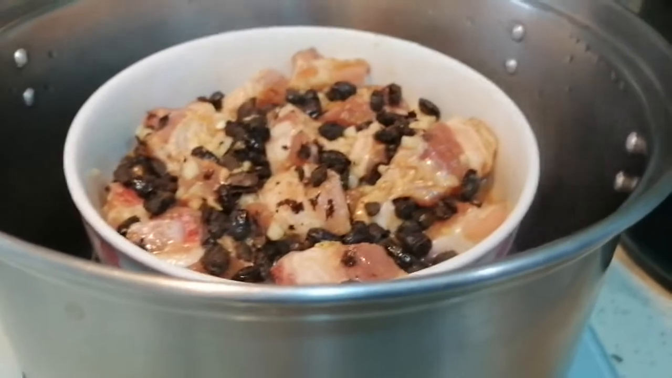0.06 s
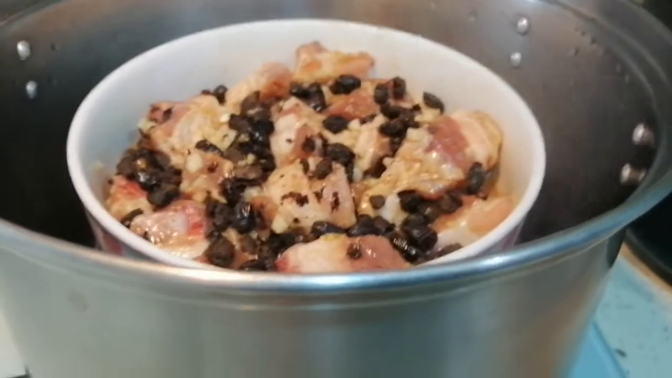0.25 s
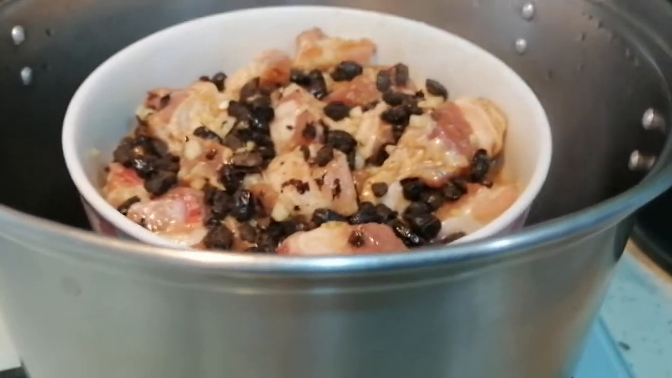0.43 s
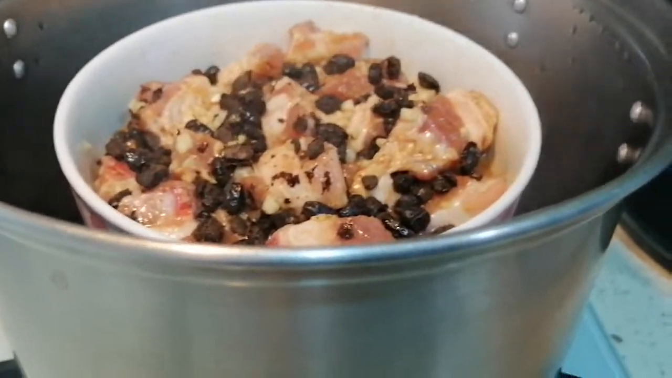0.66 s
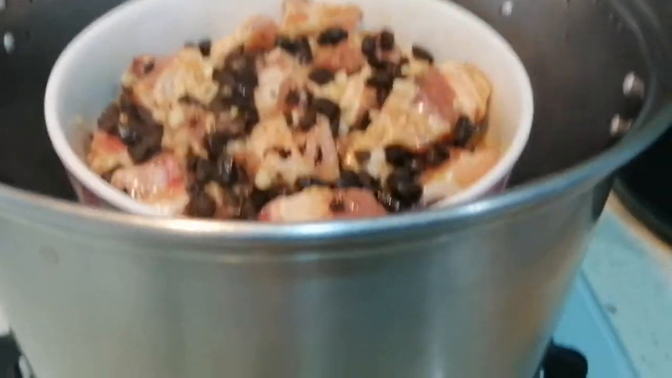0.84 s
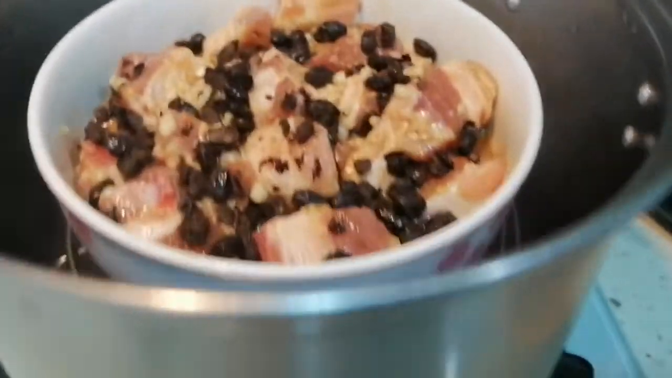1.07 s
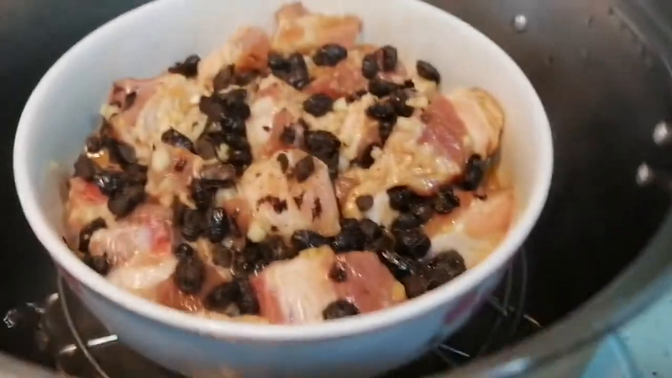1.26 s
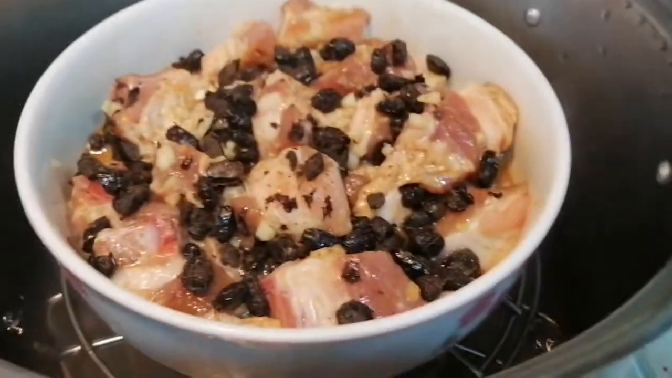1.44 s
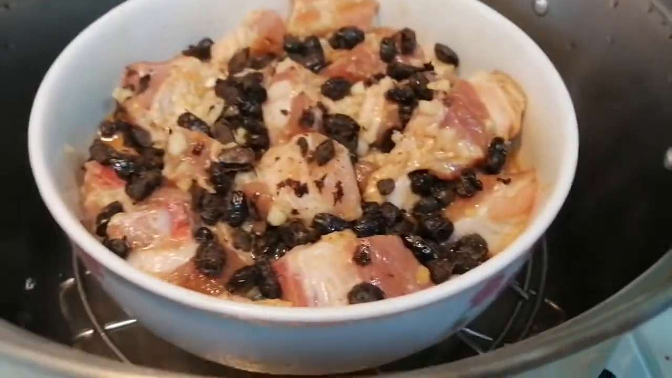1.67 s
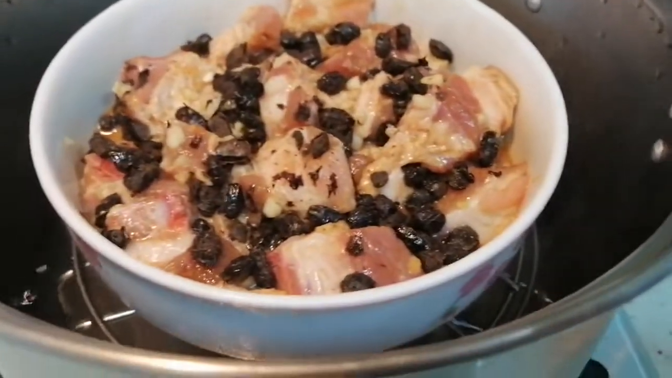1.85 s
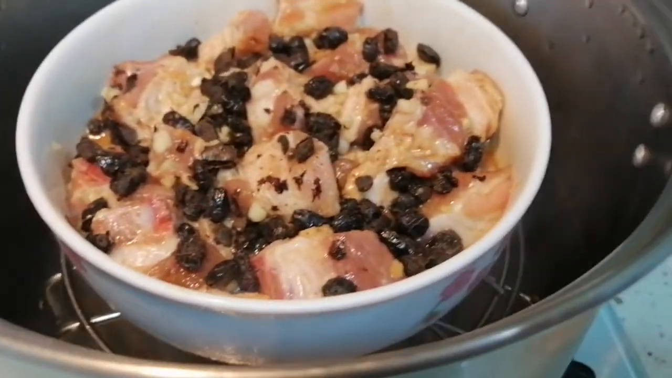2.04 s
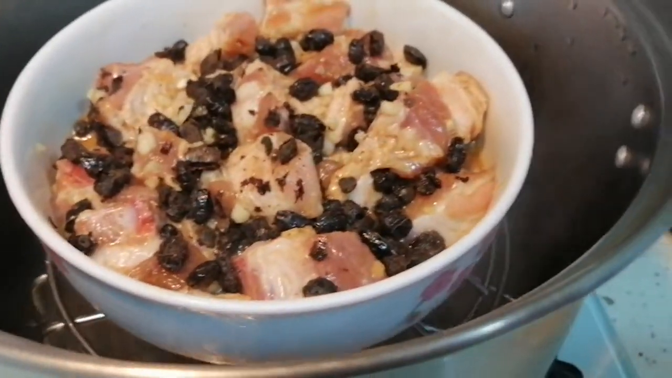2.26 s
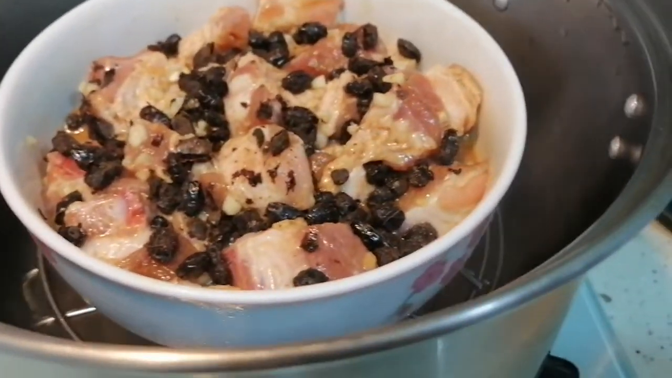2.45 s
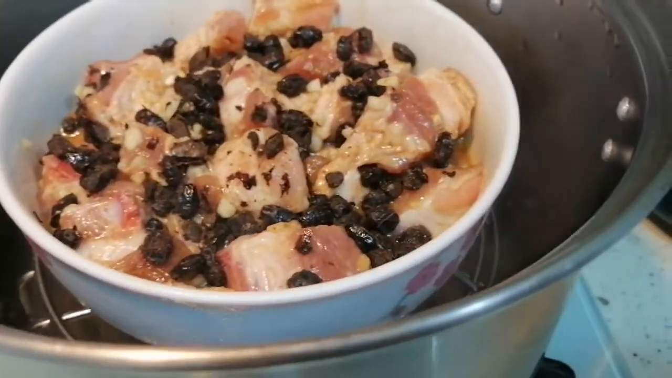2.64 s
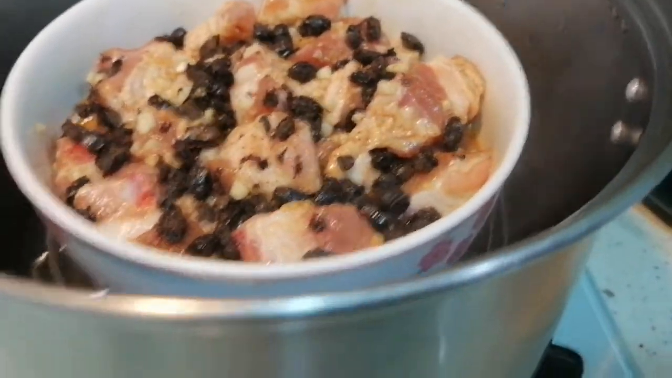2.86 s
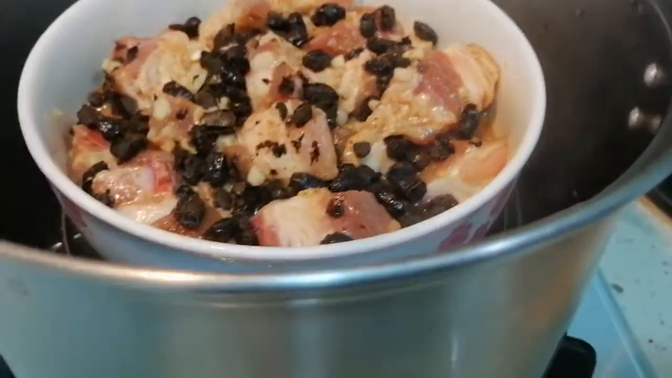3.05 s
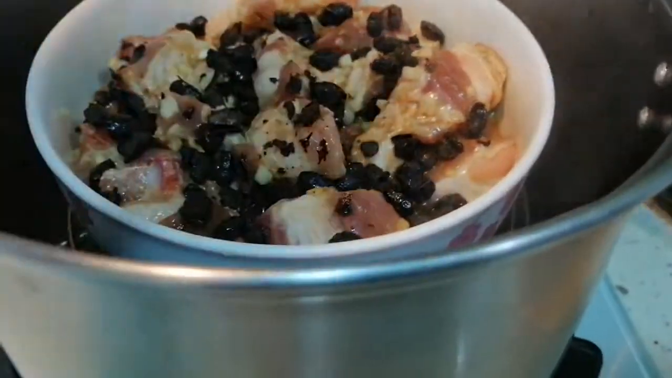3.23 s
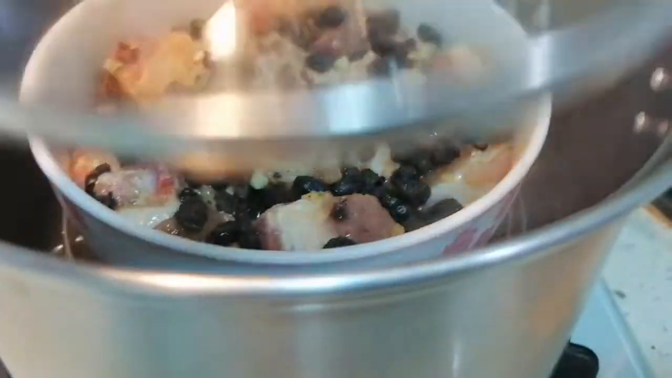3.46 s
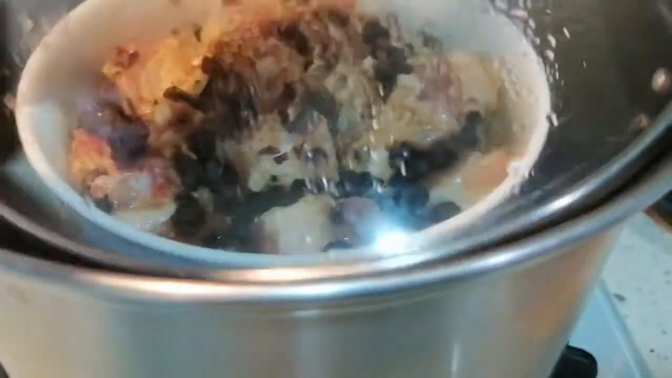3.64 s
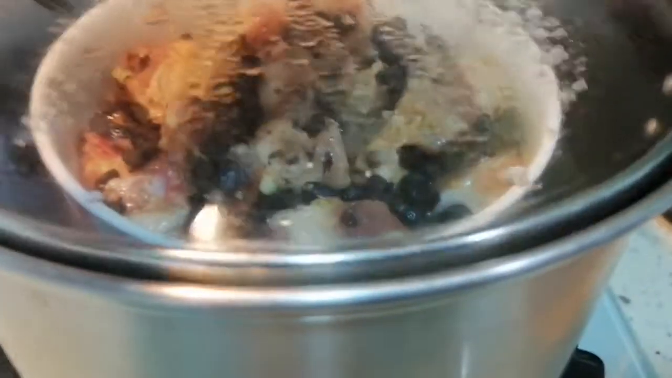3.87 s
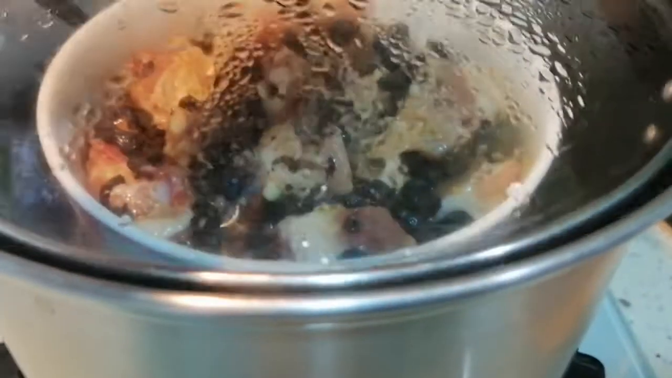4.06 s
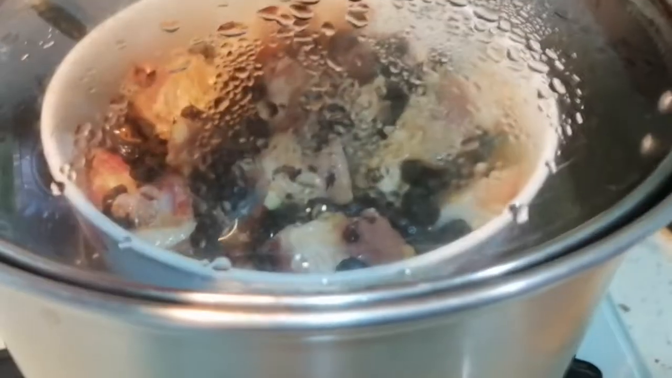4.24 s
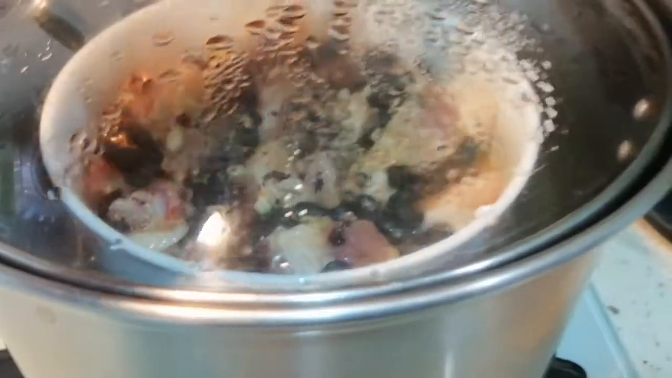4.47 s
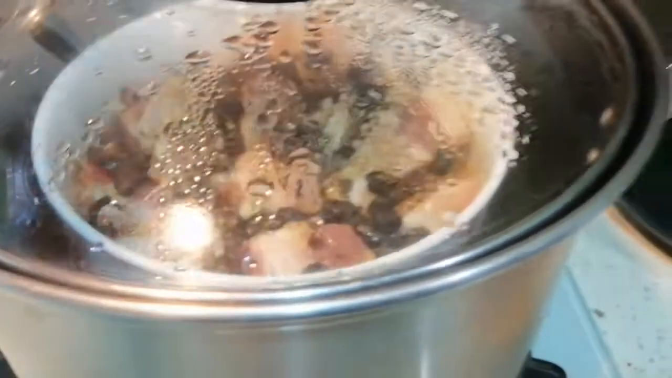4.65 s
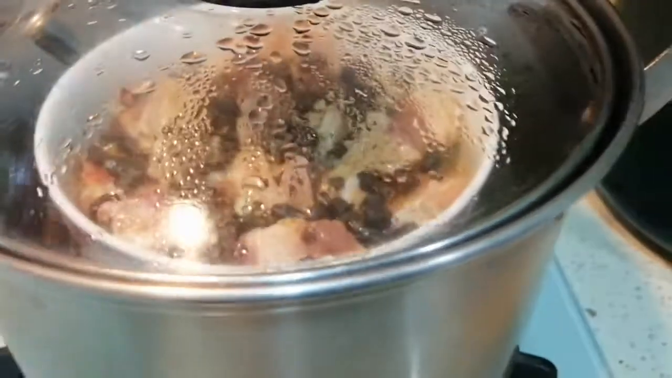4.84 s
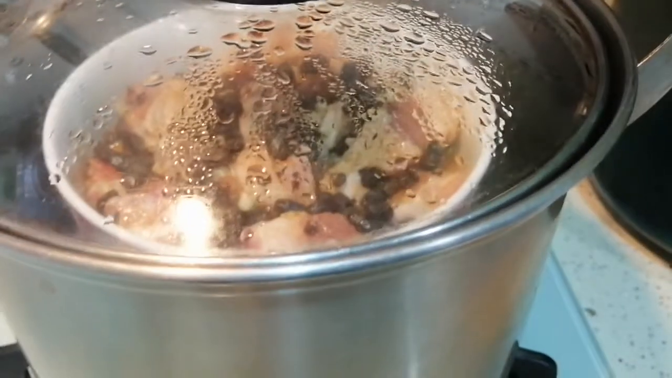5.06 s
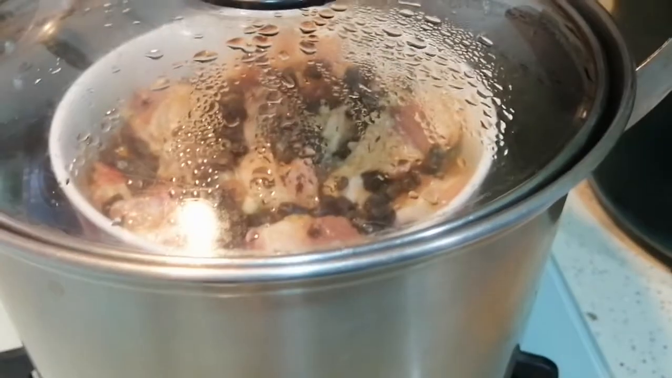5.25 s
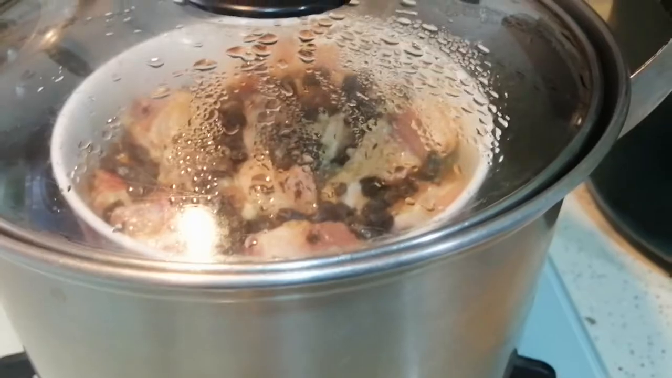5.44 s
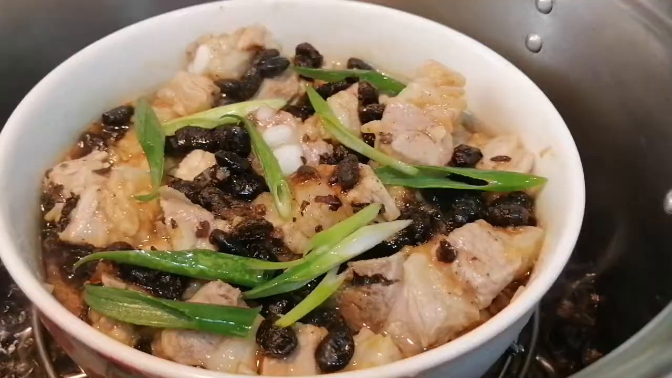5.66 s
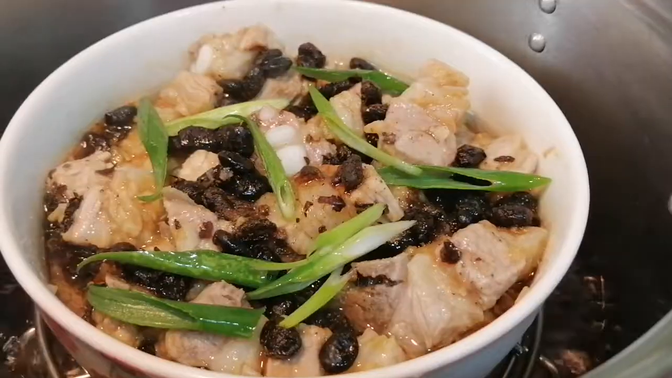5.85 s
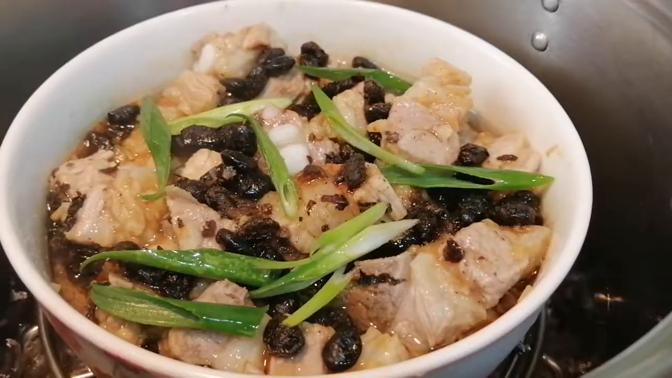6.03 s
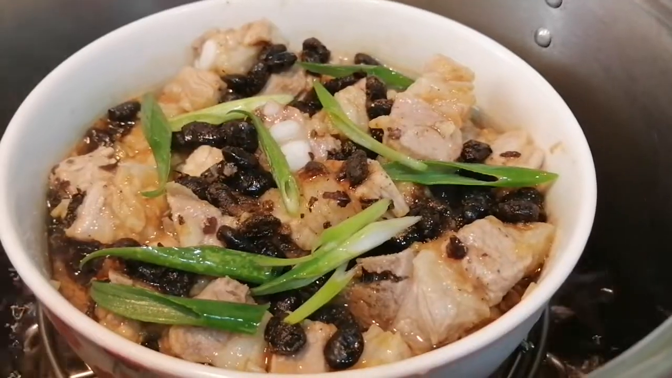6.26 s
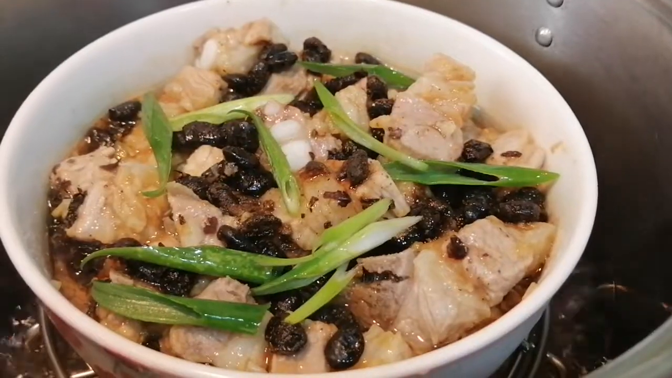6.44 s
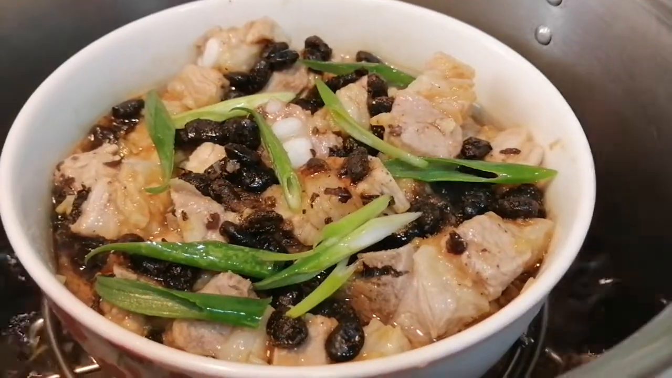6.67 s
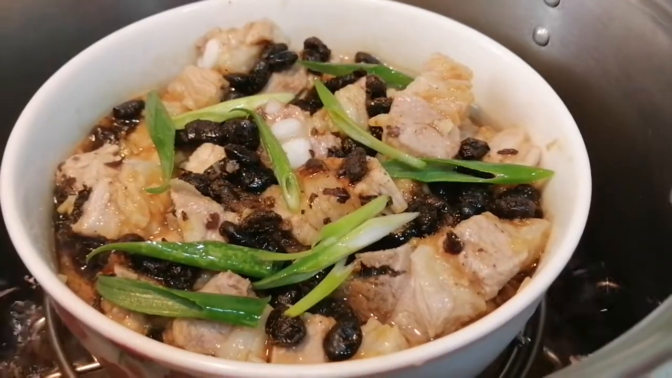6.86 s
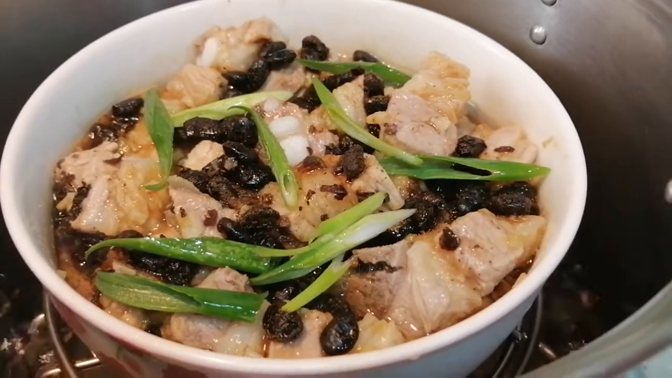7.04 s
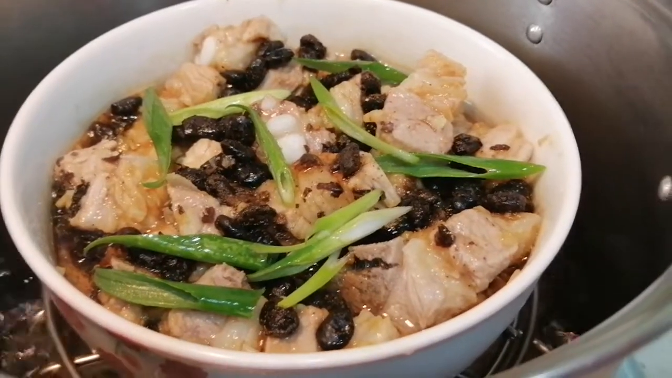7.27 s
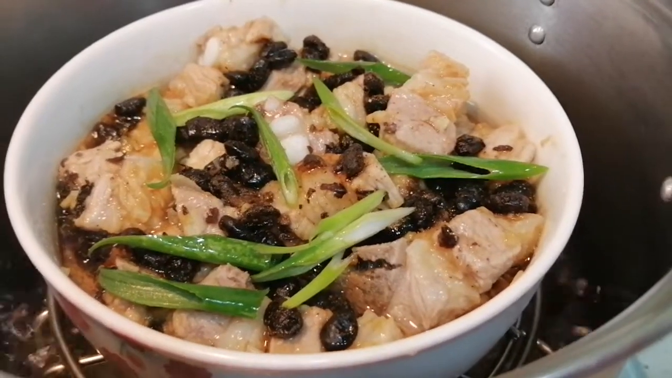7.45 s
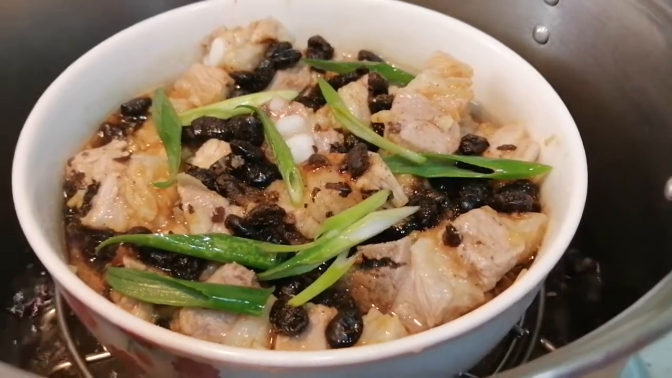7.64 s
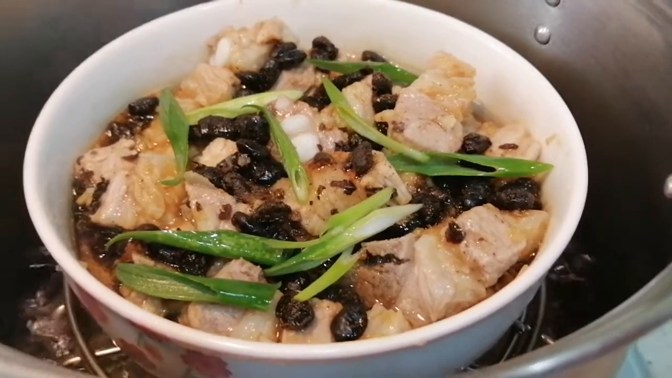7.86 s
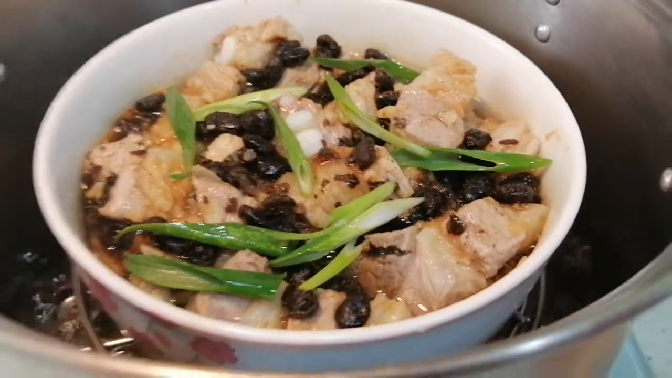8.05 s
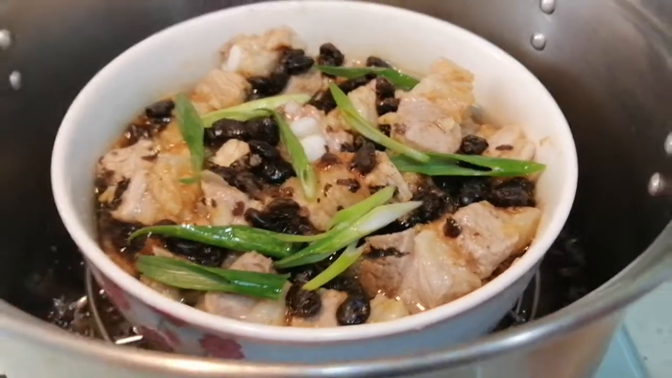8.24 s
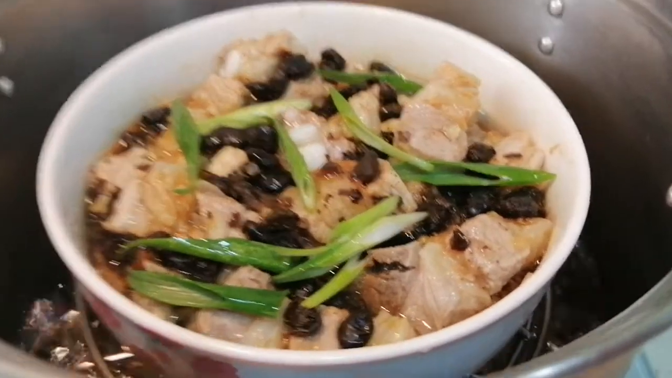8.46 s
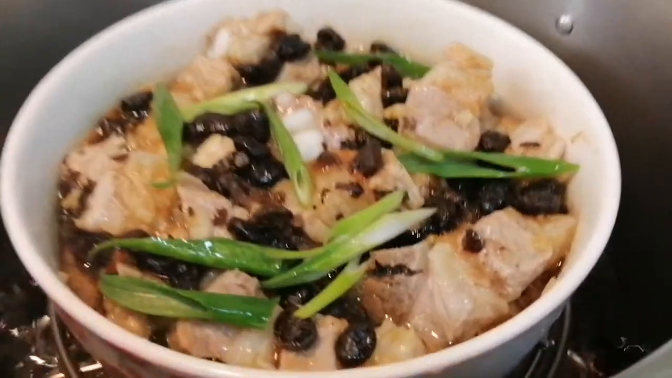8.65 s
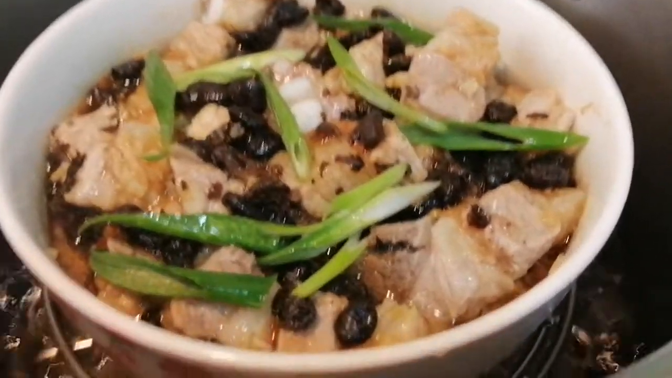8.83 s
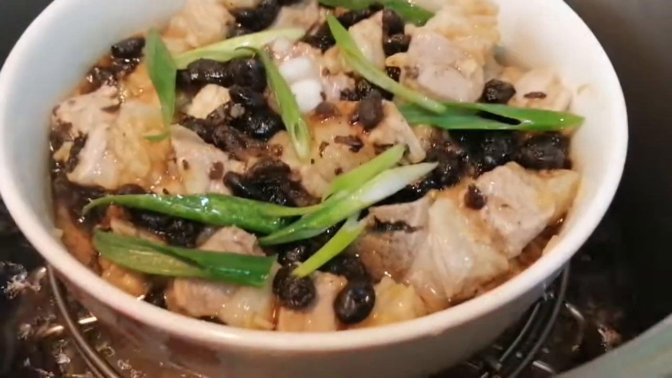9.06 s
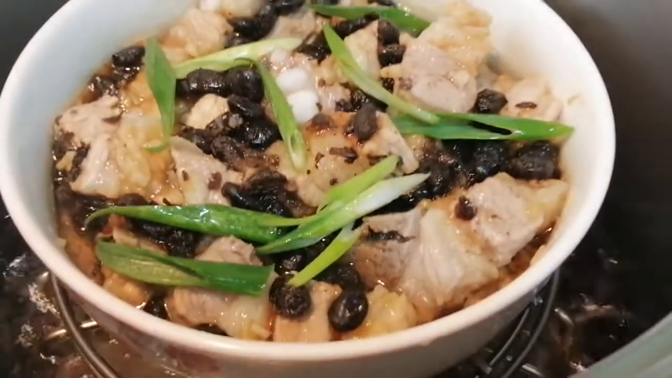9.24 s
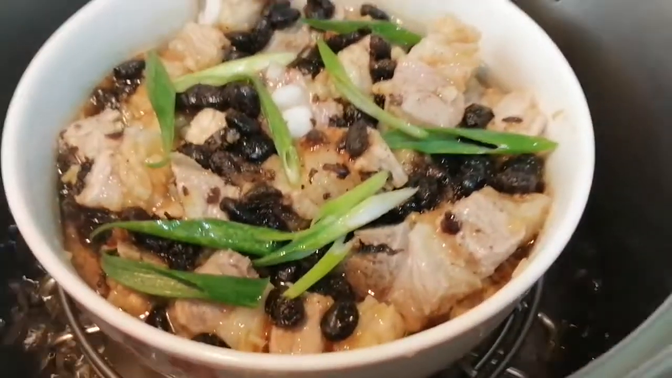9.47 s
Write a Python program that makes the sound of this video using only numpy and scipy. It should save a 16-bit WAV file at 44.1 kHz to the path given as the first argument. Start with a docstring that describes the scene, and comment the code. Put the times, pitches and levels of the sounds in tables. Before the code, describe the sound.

Close up in a small kitchen, a gas flame roars low and steady under a steel pot with faint hiss and sparse sizzles. An engine revs briefly outside, then a glass lid with a metal rim rattles, scrapes and thumps into place, slightly dulling the roar. A hard cut brings a louder open boil: spitting drops, plopping bubbles and bright steam hiss. Close stereo microphone, short room tail.

```python
"""A small kitchen: a steel steamer pot on a gas ring, heard from close by through two microphone ports.
First the flame roars under the warming pot, an engine drones outside and a glass lid rattles, slides
and drops into place. After a jump in time the open pot boils: bubbles plop, steam hisses, drops spit
and crackle. Roar, hum and hiss are coloured noise; lid, pot and bubbles are ringing tones set off by
clicks; crackles, sizzles and splashes are short puffs of noise; the engine is two sines."""
import sys
import numpy as np
from scipy import signal
from scipy.fft import rfft, irfft
from scipy.io import wavfile

SR = 44100
rng = np.random.default_rng(int(sys.argv[2]) if len(sys.argv) > 2 else 0)


def bounce(signal):
    """Save signal as a 16-bit WAV file at the path given by the first command-line argument."""
    frames = np.transpose(np.atleast_2d(signal))
    limited = np.clip(frames, -1, 1)
    pcm = np.round(limited * 32767).astype(np.int16)
    wavfile.write(sys.argv[1], SR, pcm)


N = 418950
TIME_S = np.arange(N) / SR
JUMP_S = 5.607   # from the warming pot to the boiling pot

# Steady sound of the warming pot: (pitch [Hz], left [dB per Hz], right [dB per Hz])
WARM_FLAME = [(20, -86, -82), (45, -104, -109), (66, -82, -81.5), (92, -82, -81.5), (140.6, -67.5, -67),
              (149, -80.5, -75.5), (180, -72.5, -72.5), (204, -74, -73), (252, -71.5, -72),
              (293, -73.5, -65.5), (345.3, -77, -69), (393, -88.5, -89.5), (413, -80.5, -79.5),
              (478, -87, -89.5)]
WARM_WATER = [(530, -91, -85), (580, -82, -92), (700, -86.5, -79.5), (790, -88, -91), (900, -88, -85),
              (1050, -91, -82.5), (1130, -98.5, -92.5), (1490, -94.5, -86), (1790, -98.5, -86.5),
              (2080, -93.5, -90), (2250, -98.5, -86.5), (2660, -97, -91), (3370, -101, -95.5),
              (3470, -106, -101)]
WARM_HISS = [(3960, -108, -104), (4650, -106, -102), (5200, -106, -103), (5240, -104, -102),
             (5630, -108, -100), (6800, -107, -101), (6950, -108, -101), (8140, -110, -107),
             (8900, -113, -113), (9800, -114, -114), (10900, -118, -116), (13000, -121, -117),
             (15600, -137, -126)]
# Steady sound of the boiling pot: (pitch [Hz], left [dB per Hz], right [dB per Hz])
BOIL_FLAME = [(20, -80, -77), (50, -81, -87), (83, -77, -80.5), (144, -69, -73.5), (160, -68.5, -81.5),
              (180.3, -68.5, -68), (215, -79.5, -87.5), (266, -76.5, -80.5), (321, -84, -86),
              (332, -75, -75), (417, -84.5, -93.5), (452, -88, -79), (516, -71.5, -94)]
BOIL_WATER = [(520, -76.5, -84), (580, -71.5, -75), (633, -74.5, -90), (731, -82, -70), (770, -78, -92.5),
              (963, -83, -78), (1100, -89, -87.5), (1550, -91, -84.5), (1840, -86, -84.5),
              (1843, -102.5, -95), (1980, -91.5, -87), (2260, -93, -90), (3010, -90.5, -87),
              (3320, -92, -91.5)]
BOIL_HISS = [(3780, -100, -101), (4320, -97, -99), (4950, -93.5, -94), (5300, -89, -93), (5900, -97.5, -93),
             (6750, -91, -93), (7160, -94, -95), (7870, -95.5, -93.5), (8650, -98, -103),
             (10000, -98, -104), (10600, -103, -107), (12600, -106, -108), (16400, -119, -119)]
# Narrow rings of the pot walls in the steady sound:
# (pitch [Hz], width [Hz], left lift [dB], right lift [dB])
WARM_RINGS = [(1406, 19, 5, 1), (2018, 56, 2, 9.5), (2290, 33, -11, -4), (2920, 34, 1, -2.5),
              (6890, 110, -2, -0.5), (7150, 90, 0, 7)]
BOIL_RINGS = [(1780, 130, 1.5, 6), (2070, 51, 1, 5.5), (3020, 53, 2.1, 6.5), (5620, 110, 2, 7),
              (7174, 91, 2, 11), (7700, 50, 1, 3), (8400, 66, 4.4, -2), (9600, 74, 2.7, -2)]
# Water and hiss as the boil swells and sags: (time [s], level change [dB])
BOIL_WATER_SWELL = [(5.61, -3.5), (5.72, -2), (5.9, -0.5), (5.95, 0.5), (6.1, -0.3), (7.6, -0.7),
                    (8.3, -0.5), (8.9, -1), (9.5, -1)]
BOIL_HISS_SWELL = [(5.6, 0.5), (6.5, .5), (7.0, 0.6), (7.2, 0), (7.45, 1), (7.8, -1), (8.05, 2), (8.3, -1),
                   (8.8, 0), (9.02, 1.4), (9.2, -0.5), (9.4, 1)]
# How alike the noise is left and right: (pitch [Hz], likeness [-1 to 1])
LIKENESS = [(60, 0.83), (130, 0.98), (290, 0.89), (640, 0.58), (1410, -0.2), (3100, 0.19), (6820, 0.094),
            (15000, -0.22)]
# The lid muffles the pot from this time on: (flame [dB], water [dB], hiss [dB])
LID_MUFFLES_S = 3.5
OPEN_DB, SHUT_DB = (1, 0.76, 0), (-0.5, -0.5, -1.5)
# Faint whistles of the warming pot: (pitch [Hz], average level before wavering and side gain [dB])
WHISTLES = [(5357, -97), (5495, -94), (5927, -93), (6252, -90), (6432, -88), (6729, -92), (6860, -88),
            (7163, -86), (7190, -89), (7715, -95)]
WHISTLE_T60_S, WHISTLE_WAVER_DB, WHISTLE_WAVER_PER_S = 0.11, 5, 1.5

# The biggest bubbles: (time [s], level before side gain [dB], starting pitch [Hz])
PLOPS = [(5.838, -42, 694), (5.886, -41, 520), (5.93, -34.5, 520), (5.965, -33, 700), (6.096, -44, 615),
         (6.166, -39, 550), (6.499, -42, 570), (6.65, -35, 735), (6.731, -37, 570), (6.942, -38, 560),
         (7.004, -38, 600), (7.1543, -30, 660), (7.291, -38, 600), (7.454, -40, 600), (7.868, -38, 573),
         (7.963, -39, 665), (8.174, -37, 620), (8.372, -38, 580), (8.537, -36, 590), (8.578, -44, 600),
         (8.795, -43, 675), (9.266, -36, 700), (9.373, -32, 580), (9.468, -32, 1150)]
PLOP_CYCLES = 16.0   # to die by 60 dB, counted at the starting pitch
# Water slaps the wall of the pot: (time [s], level before colouring [dB])
SPLASHES = [(6.1696, -49), (6.4619, -49), (6.894, -50), (7.0735, -49), (7.1793, -51), (7.3818, -48),
            (7.5584, -55), (7.6128, -45), (7.7076, -42), (8.5028, -40), (9.2656, -40), (9.3234, -49)]
# Colour of a splash: (pitch [Hz], left [dB], right [dB])
SPLASH_COLOUR = [(900, -14, -14), (2000, -4, 2), (3000, 2, 4), (4500, -2, -9), (6500, -14, -18),
                 (10000, -28, -28)]
SPLASH_T60_S = 0.049

# A drop spits on hot steel: (start [s], length [s], level before ringing [dB])
SPIT_BOUTS = [(5.607, 0.066, -54), (5.692, 0.095, -54), (8.083, 0.039, -60)]
# Ringing of the steel under a drop: (pitch [Hz], level [dB], time to die by 60 dB [s])
SPIT_MODES = [(10200, -12, 0.006), (9800, -5.5, 0.0083), (11000, -9, .005), (11700, -9, 0.005),
              (8000, -18, .003)]
SPIT_EDGE_S = 0.0066   # fade at each end of a bout
# The loudest bright crackles, close to the left port: (time [s], level before colouring [dB])
CRACKLES = [(1.6939, -59), (5.609, -38), (5.6405, -39), (5.649, -37), (5.6555, -38), (5.666, -36),
            (5.675, -45), (5.6935, -42), (5.699, -39), (5.705, -42), (5.72, -43), (5.728, -44),
            (5.735, -43), (5.77, -41), (5.785, -46), (5.9216, -53), (6.0308, -50), (6.0667, -49),
            (6.5072, -50), (6.595, -52), (6.824, -52), (7.208, -50), (7.3967, -48), (7.6362, -50),
            (7.912, -55), (7.9465, -52), (8.0841, -51), (8.1044, -50), (8.116, -50), (8.7811, -43),
            (8.9133, -49), (8.9582, -47), (8.9805, -48), (9.028, -45), (9.034, -48), (9.0609, -52),
            (9.136, -50), (9.19, -49)]
# Colour of a crackle: (pitch [Hz], left [dB], right [dB])
CRACKLE_COLOUR = [(1500, -19, -30), (4000, -14, -26), (7000, -24, -29), (9900, 12.5, -19), (11900, -5, -18),
                  (14900, -23, -20)]
CRACKLE_T60_S = 0.019
SNAP_DB = 5   # the click of a crackle on the steel, above its puff, before ringing
# The loudest duller, longer sizzles: (time [s], level before colouring [dB])
SIZZLES = [(0.0552, -41), (1.1694, -47), (1.4201, -44), (2.9564, -46), (3.1157, -47), (7.1007, -45),
           (8.1667, -50), (8.3613, -43), (8.5021, -44), (9.3222, -36)]
# Colour of a sizzle: (pitch [Hz], left [dB], right [dB])
SIZZLE_COLOUR = [(2500, -34, -32), (4500, -14, -19), (5500, -19, -2), (7000, -14, -6.5), (8500, -19, -13),
                 (11000, -34, -34)]
SIZZLE_T60_S = 0.15

# Lid touches the rim, each a burst of tiny contacts, with levels before ringing and colouring:
# (time [s], level [dB], time to die by 60 dB [s], thump [dB])
CONTACTS = [(3.681, -33, 0.059, -44), (3.691, -32, 0.081, -56), (3.698, -34.5, 0.072, -58),
            (3.708, -34.5, 0.071, -41), (3.721, -35.5, 0.054, -55), (3.735, -40.5, 0.17, -55),
            (3.755, -49, .15, -61), (3.77, -52, 0.15, -57), (3.852, -50, .04, -63), (3.8619, -51, .04, -63),
            (3.8684, -48, .04, -60), (3.892, -44, 0.042, -46), (3.932, -46, .05, -60),
            (3.9413, -27.5, 0.019, -29), (3.9454, -34.5, 0.043, -38), (3.949, -34.5, 0.09, -31),
            (3.969, -42, 0.2, -41), (4.1062, -37, 0.055, -22.5), (4.1157, -32, 0.052, -36),
            (4.122, -37, 0.13, -34.5), (4.145, -47, 0.17, -55), (4.2132, -40.5, 0.05, -58),
            (4.224, -47, 0.081, -45), (4.233, -51, .06, -48), (4.252, -54, 0.091, -55)]
# Lid modes, damped by hand and rim; the spot that touches decides which ring:
# (pitch [Hz], time to die by 60 dB [s], tilted [dB], dropping [dB], seating [dB], left over right [dB])
LID_MODES = [(1040, 0.1, -12, -20, -17, 1.0), (1775, 0.09, -12, -13, -11, -20.0),
             (1820, 0.11, -18.0, -13.0, -14.0, -16.0), (2200, 0.1, -17, -13, -13, -14.0),
             (2340, 0.11, -15, -6, -9, -16.0), (2450, 0.11, -27.0, -14.0, -12.0, 1.0),
             (2535, 0.12, -11, -7, -11, -9.0), (2653, 0.11, -13.0, -28.0, -24.0, -20.0),
             (2918, 0.12, -22, -10, -15, -20.0), (3090, 0.11, -25.0, -20.0, -28.0, -7.0),
             (3420, 0.08, -19, -24, -18, -5.0), (3704, 0.065, -14, -25, -20, 16.0),
             (4090, 0.09, -17, -31, -24, 11.0), (4371, 0.09, -18, -18, -22, -4.0),
             (4457, 0.11, -13, -23, -20, -7.0), (4870, 0.12, -16, -16, -18, -4.0),
             (5010, 0.11, -13.0, -25.0, -25.0, 4.0), (5265, 0.08, -15, -18, -12, -12.0),
             (5319, 0.11, -14.0, -20.0, -15.0, -3.0), (5464, 0.1, -22, -18, -18, -1.0),
             (5572, 0.11, -18.0, -17.0, -18.0, -8.0), (5760, 0.11, -23.0, -26.0, -16.0, 1.0),
             (6060, 0.13, -9, -13, -16, -18.0), (6288, 0.11, -25.0, -17.0, -25.0, -11.0),
             (6365, 0.11, -16, -23, -17, -6.0), (6451, 0.11, -17, -29, -21, -12.0),
             (6570, 0.13, -11, -20, -14, -20.0), (6710, 0.17, -19, -10, -20, -12.0),
             (6765, 0.11, -14.0, -12.0, -19.0, -14.0), (6877, 0.11, -16.0, -20.0, -22.0, -7.0),
             (6934, 0.1, -16, -23, -28, -7.0), (7031, 0.11, -15.0, -10.0, -18.0, -19.0),
             (7267, 0.11, -16.0, -17.0, -19.0, -9.0), (7340, 0.1, -16, -19, -20, -7.0),
             (7373, 0.11, -9, -16, -25, -20.0), (7525, 0.11, -24.0, -23.0, -17.0, -7.0),
             (7690, 0.11, -21.0, -15.0, -19.0, -14.0), (7843, 0.11, -29.0, -23.0, -16.0, -4.0),
             (7897, 0.11, -26.0, -20.0, -15.0, -3.0), (7983, 0.11, -22.0, -24.0, -21.0, -1.0),
             (8296, 0.09, -21, -19, -17, -5.0), (8398, 0.11, -20.0, -27.0, -25.0, 7.0),
             (8807, 0.11, -22.0, -36.0, -24.0, 11.0), (9800, 0.11, -26.0, -35.0, -19.0, 9.0)]
# Colour of the clatter: (pitch [Hz], left [dB], right [dB])
LID_CLATTER = [(80, -16, -16), (306, -3, 5.5), (755, -8, -3), (1040, -7, -3), (1340, -13, -12),
               (1760, -11, 3), (1970, -22, -4), (2320, -2, 9), (2960, -5, 2), (3600, -14, 0.5),
               (4640, 0, -3), (5460, 0, 5), (7340, -2, 2), (9150, -4, -11), (12100, -14, -10),
               (15700, -26, -20)]
# Clatter level below the treble: (tilted [dB], dropping [dB], seating [dB])
CLATTER_LOW_DB = (0.5, 7, 3.5)
# Pot body: (pitch [Hz], time to die by 60 dB [s], tilted [dB], dropping [dB], seating [dB])
THUMP_MODES = [(119, 0.13, -12, -16, -9), (199, 0.045, -6, -5, 0), (226, .06, -10, -2.5, -2),
               (294, .05, -4, -2, -17), (333, 0.07, 9, -7, -16), (570, .06, -8, 1, -28),
               (623, 0.11, 1, -3, -7.5), (785, 0.025, -6, -3, 4), (910, 0.02, -3, -8, -2.5),
               (1028, 0.045, -6, -20, 1.5), (1470, 0.008, -4, 11.5, 5), (1730, .04, -3, -4, 0),
               (2330, 0.022, -9, -3, -6), (2850, 0.025, -2, -2, 3), (3550, 0.013, -8, 7, 4)]
CONTACT_RISE_S = 0.0013
# The lid scrapes along the rim
SLIDE_S, SLIDE_RISE_S, SLIDE_DB, SLIDE_T60_S = 3.838, 0.047, -40, 0.24
# Treble lift of a -39 dB contact, and how many dB it gains per dB of contact level
TOP_LIFT_DB, TOP_FOLLOWS = 2.5, 0.39
TICK_DB = 13.5   # each contact opens with one sharp tick, this far above its burst
LID_DROPS_S, LID_SEATS_S = 3.925, 4.08
LID_SPAN = slice(round(3.6 * SR), round(4.8 * SR))   # samples in which lid and pot body ring
LID_RING_DB, CLATTER_DB = -27, -2

# Engine outside revs up, holds and drops: (time [s], pitch [Hz], level [dB])
ENGINE = [(2.1, 74.8, -80), (2.42, 79.6, -61), (2.54, 83, -50), (2.98, 94.8, -55.5), (3.3, 95, -59.5),
          (3.5, 87.9, -45), (3.58, 86.8, -49), (3.66, 86, -85)]
KITCHEN_T60_S = 0.16
# Treble resonances of the left port, then the right: (pitch [Hz], width [Hz], lift [dB])
PORTS = [
    [(8470, 1520, 11.5), (14500, 700, 12)],
    [(6936, 1960, 11.5), (14770, 660, 14.5)],
]
CUTOFF_HZ = 16300
RIGHT_LAG = 8   # samples


def pot(flame, water, hiss, rings, levels_db, flutter_db, bubbling_db, fizz_db):
    """Flame roar flutters slowly, the water hums in lumps through the pot, the hiss comes in quick grains."""
    gain = from_db(on_bins(flame + water + hiss)) * wall_rings(rings)
    low = on_bins([(flame[-1][0], 1), (water[0][0], 0)])
    high = on_bins([(water[-1][0], 0), (hiss[0][0], 1)])
    # Large and small bubbles swell partly on their own; under the flame their shares nearly cancel
    upper = on_bins([(1100, 0.65), (1400, 1)])
    flame_db, water_db, hiss_db = levels_db
    lumps_db = water_db + bubbling_db * drift(32)
    flame_level = flame_db + flutter_db * drift(3.2)
    large_level = lumps_db + bubbling_db * 0.27 * drift(6.2)
    small_level = lumps_db + bubbling_db * 0.39 * drift(3.5)
    hiss_level = hiss_db + fizz_db * (drift(69) + 0.88 * drift(17.0))
    parts = [(low, flame_level), (1 - low - upper, large_level),
             (upper - high, small_level), (high, hiss_level)]
    noise = air_noise()
    return sum(colour(noise * from_db(level_db), gain * share) for share, level_db in parts)


def wall_rings(rings):
    """The pot walls lift or dip a few narrow bands, differently on each side: gain per bin."""
    bins_hz = np.arange(N // 2 + 1) * SR / N
    total_db = 0
    for hz, width_hz, left_db, right_db in rings:
        peak_db = np.array([[left_db], [right_db]])
        total_db = total_db + peak_db / (1 + (2 * (bins_hz - hz) / width_hz) ** 2)
    return from_db(total_db)


def air_noise():
    """Stereo white noise of 0 dB per Hz, alike in the bass, nearly unrelated in the treble."""
    alike = np.clip(on_bins(LIKENESS)[0], -1, 1)
    mid, side = rfft(rng.standard_normal((2, N))) * np.sqrt(SR / 4)
    return irfft(np.sqrt(1 + alike) * mid + np.sqrt(1 - alike) * side * [[1], [-1]], N)


def bubbles(per_s, low_hz, high_hz, cycles, spread_db, level_db):
    """Bubbles burst at random and ring some cycles; each pitch has its own strength left and right."""
    train = clicks(per_s, spread_db)
    dealt = rng.integers(0, 24, N)   # which of 24 pitches a bubble gets
    out = np.zeros((2, N))
    for k, hz in enumerate(np.geomspace(low_hz, high_hz, num=24)):
        tone = ring(train * (dealt == k), hz * rng.uniform(1.0, 1.03), cycles / hz)
        out += tone * rng.uniform(0.4, 1, (2, 1))
    return from_db(level_db) * out / out.std()


def whistles():
    """Noise through narrow resonances, each swelling and fading on its own, louder on the right."""
    out = np.zeros((2, N))
    for hz, level_db in WHISTLES:
        tone = ring(rng.standard_normal((2, N)), hz, WHISTLE_T60_S)
        waver_db = WHISTLE_WAVER_DB * drift(WHISTLE_WAVER_PER_S)
        out += tone / tone.std() * from_db(level_db + waver_db)
    return out * from_db([[-6.0], [0]])


def plops():
    """A bubble rings a few cycles, with a weaker overtone, while its pitch rises."""
    out, t = np.zeros(N), np.arange(round(0.05 * SR)) / SR
    for s, peak_db, hz in PLOPS:
        i = round(s * SR)
        phase = 2 * np.pi * hz * t * (1 + 4.3 * t)
        fade = from_db(peak_db - 60 * t * hz / PLOP_CYCLES)
        attack = np.minimum(t / 0.0006, 1)
        wave = (np.sin(phase) + 0.42 * np.sin(1.76 * phase)) * fade * attack
        out[i:i + len(t)] += wave[:N - i]
    return out * from_db([[-1.5], [-4.0]])


def splashes():
    """Water slaps the wall of the pot: puffs of noise, strongest in the middle pitches."""
    return puffs(SPLASHES, SPLASH_T60_S, SPLASH_COLOUR, 0)


def spitting():
    """Dense sharp clicks into a few bright, very short modes, close to the left port."""
    bouts = np.zeros(N)
    for s, length, level_db in SPIT_BOUTS:
        edges = np.minimum(TIME_S - s, s + length - TIME_S) / SPIT_EDGE_S
        bouts += from_db(level_db) * np.clip(edges, 0, 1)
    times, peak_db = np.transpose(CRACKLES)
    snaps = spikes(times, from_db(peak_db + SNAP_DB))
    out = np.zeros(N)
    for hz, level_db, t60 in SPIT_MODES:
        out += from_db(level_db) * ring(bouts * clicks(500, 4.3) + snaps, hz, t60)
    return out * from_db([[-6.0], [-18.0]])


def crackles(per_s, small_db, sizzles_per_s, sizzle_db):
    """Bursting droplets puff: the loudest at set times, faint ones at random, small bright ones at the boil."""
    small = from_db(small_db) * np.abs(clicks(per_s, 3.2)) * (np.arange(N) >= JUMP_S * SR)
    faint = from_db(sizzle_db) * np.abs(clicks(sizzles_per_s, 2.0))
    bright = puffs(CRACKLES, CRACKLE_T60_S, CRACKLE_COLOUR, small)
    return bright + puffs(SIZZLES, SIZZLE_T60_S, SIZZLE_COLOUR, faint)


def lid():
    """Bursts of contacts ring the lid's modes and clatter; the weight of each thumps the pot."""
    force = lid_force()
    times, contact_db, _, thump_db = np.transpose(CONTACTS)
    ticks = spikes(times, from_db(contact_db + TICK_DB))
    pose = np.digitize(TIME_S, [LID_DROPS_S, LID_SEATS_S])   # 0 tilted, 1 dropping, 2 seating
    out = lid_clatter(force, ticks, pose)
    out[:, LID_SPAN] += lid_ringing(force[:, LID_SPAN], ticks[LID_SPAN], pose[LID_SPAN])
    out[:, LID_SPAN] += pot_thump(spikes(times, from_db(thump_db)), pose[LID_SPAN])
    return out


def lid_force():
    """Each touch and the slide press in bursts; softer ones are duller. Rows: lower pitches, treble."""
    force = np.zeros((2, N))
    touches = [(s, level_db, CONTACT_RISE_S, t60) for s, level_db, t60, _ in CONTACTS]
    touches.append((SLIDE_S, SLIDE_DB, SLIDE_RISE_S, SLIDE_T60_S))
    for s, level_db, rise, t60 in touches:
        lift_db = TOP_LIFT_DB + TOP_FOLLOWS * (level_db + 39)
        force += from_db([[level_db], [level_db + lift_db]]) * burst(s, rise, t60)
    return force


def lid_clatter(force, ticks, pose):
    """Grainy contacts and ticks make a broad clatter, whose low part depends on how the lid lies."""
    grains = np.array([clicks(2500, 2.3), clicks(2500, 2.2)])   # left and right
    lower = force[0] * grains + ticks
    treble = force[1] * grains + ticks
    gain = from_db(on_bins(LID_CLATTER) + CLATTER_DB)
    top = on_bins([(7000, 0.35), (8000, 0.76)])   # share driven by the treble force
    low = on_bins([(4000, 0.82), (5000, 0.18)])   # share of the rest that follows the pose
    out = colour(lower * from_db(CLATTER_LOW_DB)[pose], gain * (1 - top) * low)
    out += colour(lower, gain * (1 - top) * (1 - low))
    return out + colour(treble, gain * top)


def lid_ringing(force, ticks, pose):
    """Contacts set the modes of the glass ringing; each mode radiates its own way."""
    out = np.zeros((2, len(pose)))
    for hz, t60, *pose_db, pan_db in LID_MODES:
        grains = clicks(2500, 3.3, size=len(pose))
        drive = force[int(hz > 7500)] * grains + ticks * rng.choice([-1, 1])
        side = from_db(np.minimum([[pan_db], [-pan_db]], 0))   # turns down the weaker side only
        out += side * ring(drive * from_db(pose_db)[pose] * from_db(LID_RING_DB), hz, t60)
    return out


def pot_thump(knocks, pose):
    """Soft knocks ring the pot body, which is too small to radiate deep bass."""
    push = signal.lfilter([0.2], [1, -0.8], knocks)[LID_SPAN]   # softens the contact
    thump = np.zeros(len(pose))
    for hz, t60, *pose_db in THUMP_MODES:
        thump += ring(push * from_db(pose_db)[pose], hz, t60)
    thump = signal.sosfilt(signal.butter(4, 105, "high", fs=SR, output="sos"), thump)
    return thump * from_db([[-5.0], [-10.0]])


def engine():
    """The engine outside is a firing tone with a weak octave."""
    hz, level_db = in_time(ENGINE)
    phase = 2 * np.pi * np.cumsum(hz) / SR
    return np.sqrt(2) * from_db(level_db) * (np.sin(phase) + from_db(-6.0) * np.sin(2 * phase))


def kitchen(x):
    """The room adds a short diffuse tail: decaying noise of its own on each side, unit energy."""
    tail = rng.standard_normal((2, N)) * from_db(-60 * TIME_S / KITCHEN_T60_S)
    tail *= np.minimum(TIME_S / 0.0054, 1)
    tail /= np.sqrt((tail ** 2).sum(axis=1, keepdims=True))
    return colour(x, rfft(tail))


def echo_ripple():
    """Echoes in pot and kitchen comb the steady sound finely above the bass, as a gain per bin."""
    echoes = rfft(rng.standard_normal((2, N)) * from_db(-60 * TIME_S / 0.16))
    echoes /= np.sqrt(np.mean(np.abs(echoes) ** 2))
    share = on_bins([(600, 0), (1200, 0.1)])   # echo share of the power
    return np.abs(np.sqrt(1 - share) + np.sqrt(share) * echoes)


def from_db(db):
    """Gain of a level in dB."""
    return 10 ** (np.asarray(db) / 20)


def in_time(rows):
    """The columns of a table, sample by sample."""
    s, *columns = np.transpose(rows)
    return [np.interp(TIME_S, s, c) for c in columns]


def on_bins(rows):
    """The columns of a spectrum table on the FFT bins, joined along log pitch."""
    hz, *columns = np.transpose(rows)
    bins = np.log(np.arange(N // 2 + 1) * SR / N + 1)   # 1 Hz added to avoid log of zero
    return np.array([np.interp(bins, np.log(hz), c) for c in columns])


def colour(x, gain):
    """Filter by a gain per bin."""
    return irfft(rfft(x) * gain, N)


def drift(rate):
    """Slow random wander of spread 1, changing about rate times a second."""
    r = np.exp(-2 * np.pi * rate / SR)
    slow = signal.lfilter([1], [1, -2 * r, r * r], rng.standard_normal(N + SR))[SR:]
    return slow / slow.std()


def clicks(per_s, spread_db, size=N):
    """Random clicks of random sign, a few far larger than the rest; spread 1."""
    sizes = from_db(spread_db * np.minimum(rng.exponential(1, size), 4)) * rng.choice([-1, 1], size)
    train = sizes * (rng.random(size) < per_s / SR)
    return train / train.std()


def ring(x, hz, t60):
    """A unit click sets a decaying sine ringing from height 1."""
    r, w = from_db(-60 / (t60 * SR)), 2 * np.pi * hz / SR
    return signal.lfilter([0, np.sin(w)], [1, -2 * r * np.cos(w), r * r], x + 1e-18)


def spikes(times, heights):
    """One click per event."""
    out = np.zeros(N)
    np.add.at(out, np.round(np.array(times) * SR).astype(int), heights)
    return out


def puffs(events, t60, spectrum, at_random):
    """Short bursts of noise that die away, coloured per side."""
    times, peak_db = np.transpose(events)
    starts = spikes(times, from_db(peak_db)) + at_random + 1e-18
    envelope = signal.lfilter([1], [1, -from_db(-60 / (t60 * SR))], starts)
    return colour(envelope * rng.standard_normal((2, N)), from_db(on_bins(spectrum)))


def burst(s, rise, t60):
    """Straight rise from time s, then decay; height 1."""
    age = TIME_S - s
    return np.clip(age / rise, 0, 1) * from_db(-60 * np.clip(age - rise, 0, 2) / t60)


def scene():
    """Warming pot before the jump, boiling pot after, with the near events and their room tail."""
    shut = TIME_S > LID_MUFFLES_S
    muffled_db = [np.where(shut, b, a) for a, b in zip(OPEN_DB, SHUT_DB)]
    warm = pot(WARM_FLAME, WARM_WATER, WARM_HISS, WARM_RINGS, muffled_db,
               flutter_db=0.5, bubbling_db=0.6, fizz_db=1.1)
    warm += bubbles(150, 4370, 8200, cycles=90, spread_db=11.0, level_db=-87)
    warm += whistles()
    boil_db = (1.0, in_time(BOIL_WATER_SWELL)[0], in_time(BOIL_HISS_SWELL)[0])   # flame, water, hiss
    boil = pot(BOIL_FLAME, BOIL_WATER, BOIL_HISS, BOIL_RINGS, boil_db,
               flutter_db=0.9, bubbling_db=0.8, fizz_db=1.06)
    boil += bubbles(220, 473, 3650, cycles=32, spread_db=3.5, level_db=-64.0)
    boil += bubbles(300, 4790, 9460, cycles=150, spread_db=5.0, level_db=-68.0)
    steady = colour(np.where(np.arange(N) < JUMP_S * SR, warm, boil), echo_ripple())
    close = spitting() + crackles(per_s=41, small_db=-91.5, sizzles_per_s=1.0, sizzle_db=-100.5)
    near = lid() + plops() + splashes()
    room = kitchen(from_db(-6.5) * near + from_db(-12) * close)
    return steady + engine() + near + close + room


def record(dry):
    """Each port lifts its own treble resonances, the right hears a little late, the top is cut."""
    out = np.array([dry[0], np.roll(dry[1], RIGHT_LAG)])
    for k, peaks in enumerate(PORTS):
        for hz, width_hz, lift_db in peaks:
            g, w = from_db(lift_db / 2), 2 * np.pi * hz / SR
            a = np.sin(w) * width_hz / hz / 2
            top = [1 + a * g, -2 * np.cos(w), 1 - a * g]
            bottom = [1 + a / g, -2 * np.cos(w), 1 - a / g]
            out[k] = signal.lfilter(top, bottom, out[k])
    return signal.sosfilt(signal.cheby2(14, 80, CUTOFF_HZ, fs=SR, output="sos"), out)


dry = scene()
out = record(dry)
bounce(out)
```